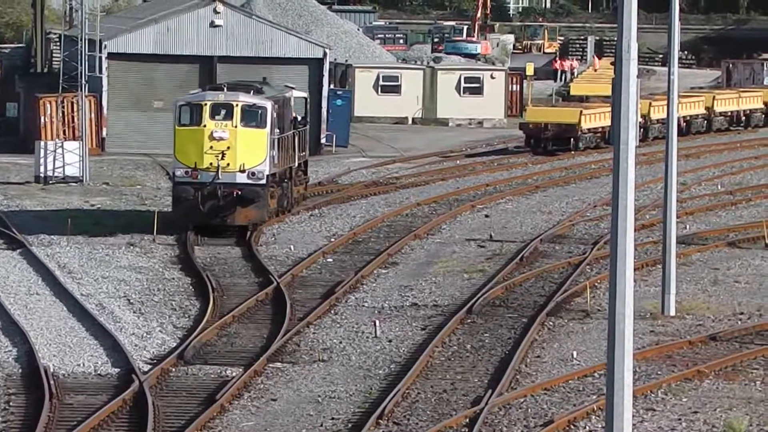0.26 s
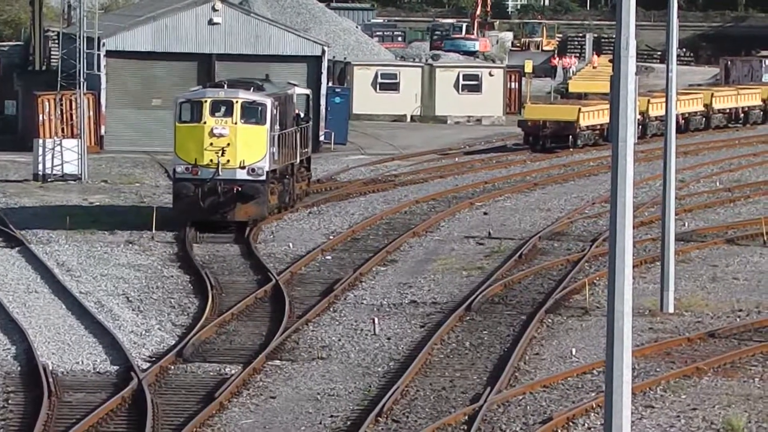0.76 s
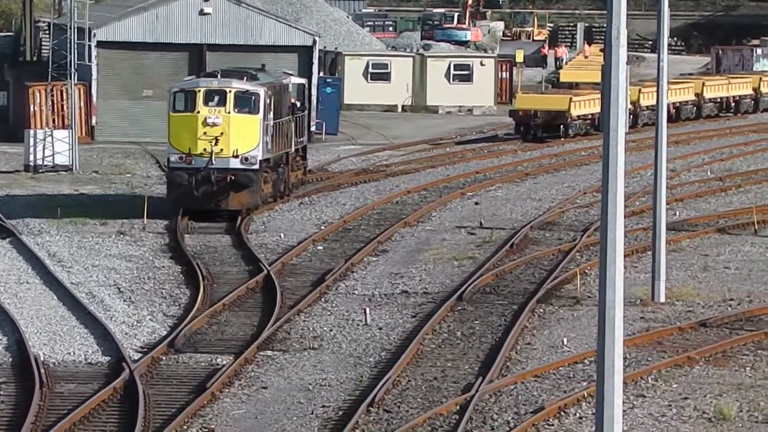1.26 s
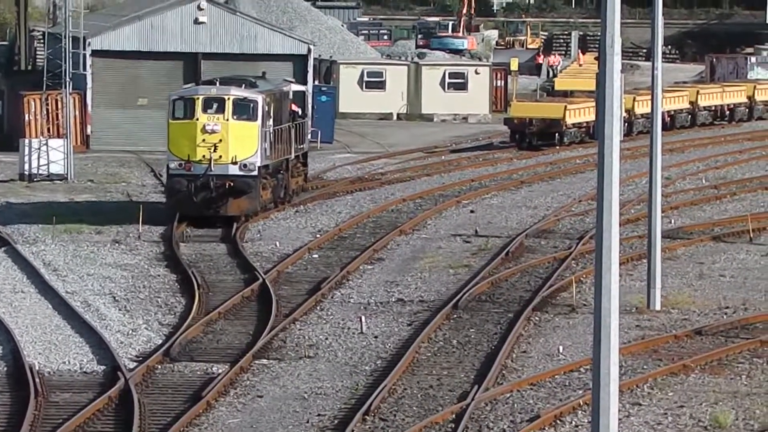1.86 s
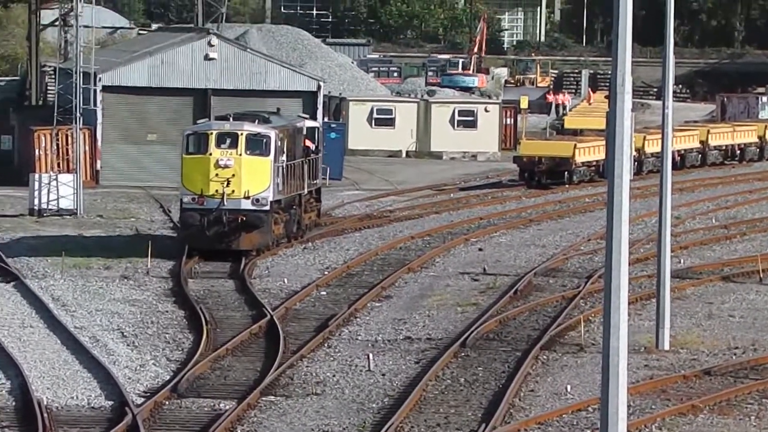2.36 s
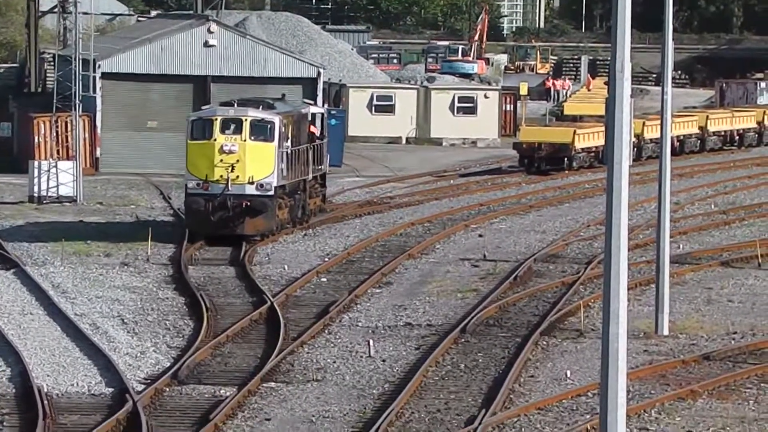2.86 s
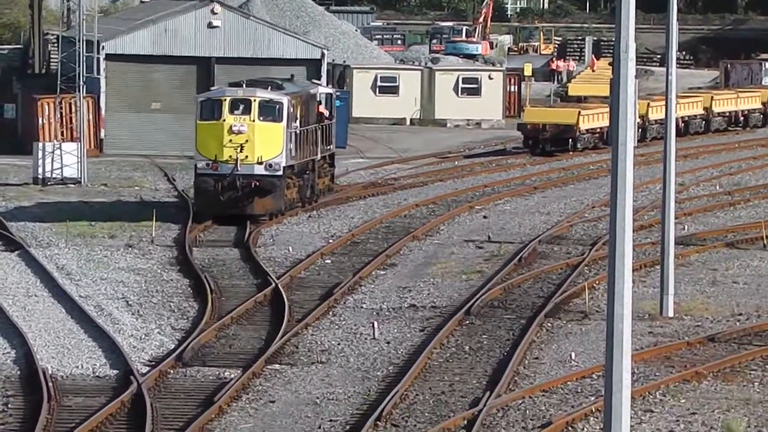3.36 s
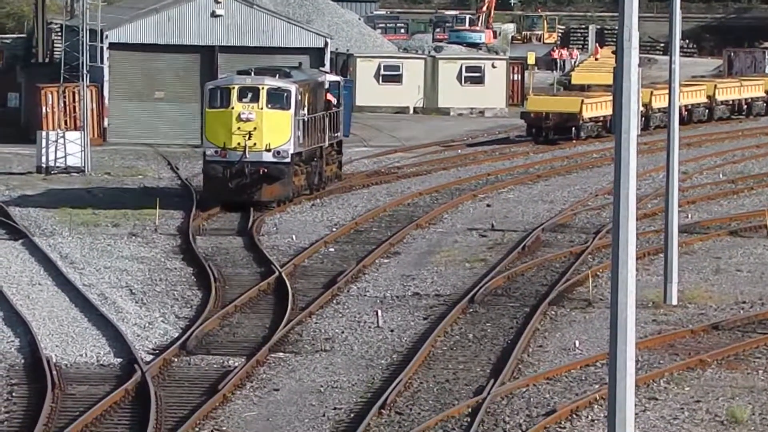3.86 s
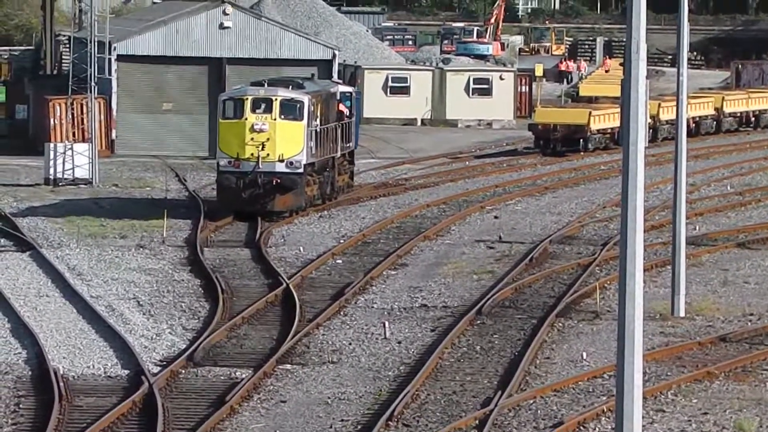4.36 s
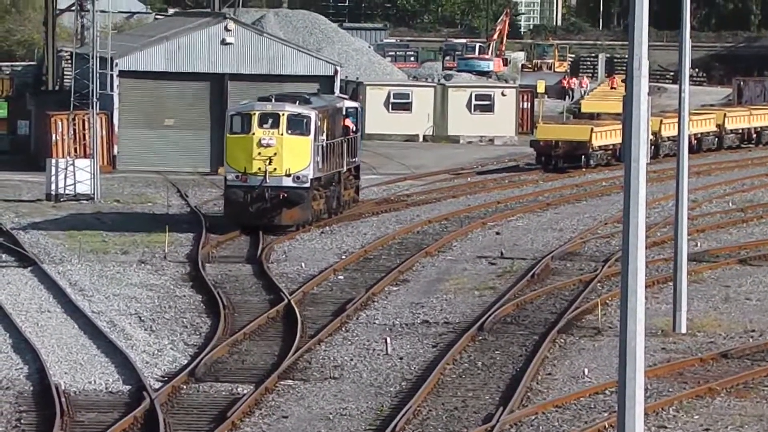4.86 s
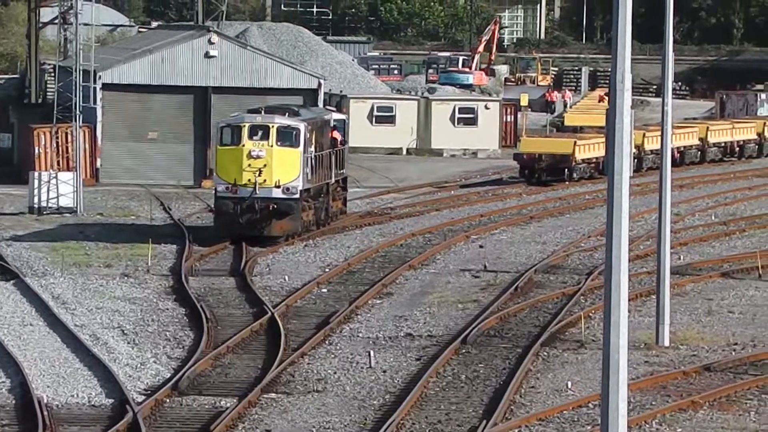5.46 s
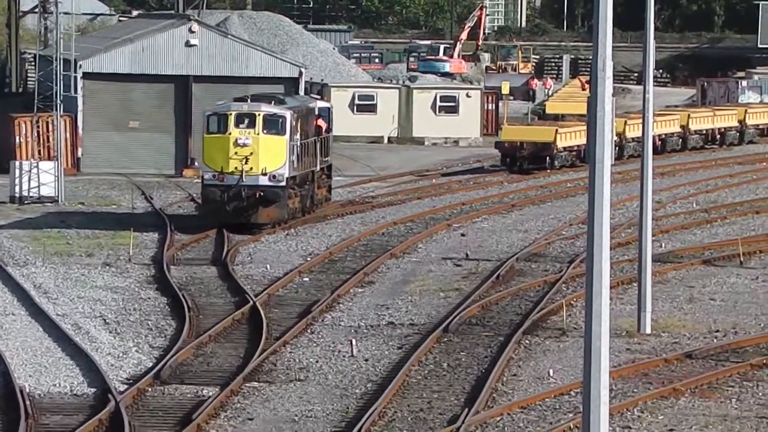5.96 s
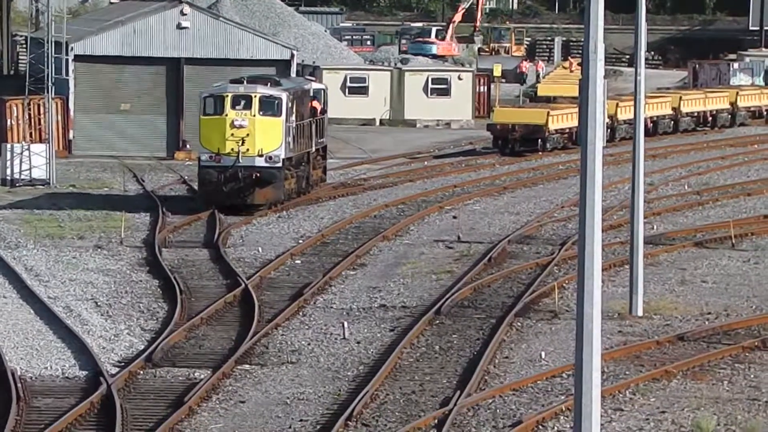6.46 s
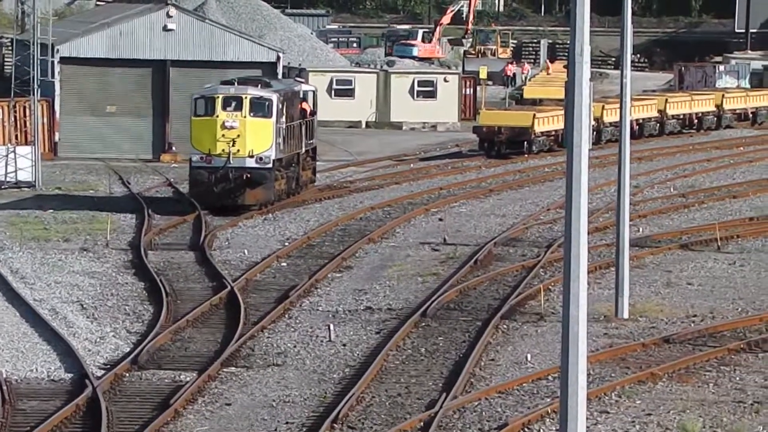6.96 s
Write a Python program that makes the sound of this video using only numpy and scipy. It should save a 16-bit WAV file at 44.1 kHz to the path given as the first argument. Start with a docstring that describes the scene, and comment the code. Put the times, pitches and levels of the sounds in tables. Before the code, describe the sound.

Outdoors in a rail yard, a diesel locomotive throbs and roars, its pitch sagging as it grows louder. A gear whine and tiny metallic squeak surface on the way. After the peak the firing quickens and the engine softens, with couplings knocking and a bird chirping faintly. Air hiss runs throughout. A stereo microphone some way off catches small close ticks; the low sound starts centred, then widens.

```python
"""A diesel locomotive in a rail yard: puffed noise and wavering firing tones bog down for about 3 s.
On the way a gear whine (gliding tones) and a squeak (jittered tones) enter, among ticks of shaped noise.
The roar peaks near 3.3 s; then the firing quickens and the engine eases, amid knocks and chirps of a bird.
Air hiss runs throughout. Treble noise is in opposite phase at the microphone pair; the low sound is
centred at first, and later spreads, mostly to the right, in wide spans."""
import sys
import numpy as np
from scipy import signal
from scipy.fft import rfft, irfft, next_fast_len
from scipy.io import wavfile
from scipy.ndimage import uniform_filter1d, map_coordinates

SR = 44100
rng = np.random.default_rng(int(sys.argv[2]) if len(sys.argv) > 2 else 0)


def transcribe(signal):
    """Save signal, clipped to [-1, 1], as a 16-bit WAV file at the path in sys.argv[1]."""
    frames = np.atleast_2d(signal).T
    limited = np.clip(frames, -1, 1)
    pcm = np.round(limited * 32767).astype(np.int16)
    wavfile.write(sys.argv[1], SR, pcm)


N = 318402

# Engine course: t/s, mean firing rate f/Hz, rumble level/dB, roar level/dB
ENGINE = [(0, 117.5, -27.5, -27.5), (.3, 116.4, -28, -24), (.7, 113.4, -26.5, -23.5),
          (1.1, 109.2, -25.5, -21), (1.45, 108.4, -28, -22.5), (1.75, 105.9, -24.5, -25),
          (2.05, 103.9, -30, -20), (2.2, 101.7, -20.5, -20), (2.55, 98.5, -27.5, -19.5),
          (2.85, 98.2, -34.5, -18.5), (3.1, 98.3, -24.5, -18), (3.3, 98.7, -20, -15),
          (3.55, 100.1, -19.5, -16.5), (3.85, 102.3, -19.5, -18), (4.2, 106.4, -22, -19),
          (4.55, 107.2, -26, -21.5), (5.25, 115.6, -27, -23), (5.8, 117.4, -27.5, -23),
          (6.2, 120.2, -34, -27), (6.6, 125.5, -34, -28), (7.22, 128.7, -34.5, -30.5)]
# Colour change as the engine moves along the curve: t/s, share of the later spectrum
TURN = [(0, 0.069), (1.8, 0.064), (2.1, 0.39), (2.6, 1), (7.22, 1)]

# Spectra: one, or an earlier and a later one; each f/Hz, relative level/dB
RUMBLE_SPECTRA = [
    [(13, -34), (22, -20), (54, -6.5), (108, -0.5), (203, -7), (260, -8.5), (340, -46), (570, -120)],
    [(13, -46), (22, -29), (48, -3.5), (124, 3), (162, -2.5), (199, -2.5), (260, -20), (340, -34),
     (570, -120)],
]
ROAR_SPECTRA = [
    [(140, -17), (230, -19), (285, -7), (353, 5), (461, -0.5), (580, -1), (639, -3.5), (1150, -7.5),
     (1350, -35), (1760, -60), (2970, -120)],
    [(140, -9.5), (230, -3), (285, -3), (343, 2), (410, 3), (461, 3), (516, 0.5), (714, -3.5), (1030, -2),
     (1350, -14), (1760, -24.5), (2970, -120)],
]
CLATTER_SPECTRA = [
    [(760, -30), (1300, 1), (1430, 0), (1730, 8), (2080, 2.5), (2650, 2), (2970, 1), (3100, -46),
     (4030, -37), (6820, -120)],
    [(760, -26), (1300, -1), (1770, 2.5), (2150, -2), (2400, -8), (2800, -13), (3100, -13.5), (4030, -45),
     (6820, -120)],
]
FAN_SPECTRA = [
    [(1850, -44), (3150, 0.5), (3750, 9), (4460, 1.5), (5160, 2), (6300, -14), (7000, -7), (7500, -20),
     (9750, -72), (16500, -120)],
    [(1820, 0), (3100, 3), (3700, 4), (4020, 1.5), (4690, 1), (5920, -5), (7500, -18), (9750, -85),
     (16500, -120)],
]
AIR_LOW_SPECTRA = [
    [(1850, -54), (3150, -5), (3930, -3), (5260, 3), (6490, -1), (7600, -19), (9880, -49), (16700, -120)],
    [(1820, -13), (3100, -3.5), (3800, -5.5), (4840, -9.5), (6110, -11), (6950, -21), (7600, -20),
     (9880, -50), (16700, -120)],
]
AIR_HIGH_SPECTRA = [
    [(4760, -34), (8100, -10), (8420, 1), (8930, 3), (10400, -8), (11300, 3), (11800, -1), (15100, -11),
     (15800, -8.5)],
    [(4760, -35), (8100, -7), (8520, -4), (9030, -3), (13400, -7), (15100, -13), (15800, -14)],
]
AIR_CENTRE_SPECTRA = [
    [(4880, -46), (8300, -10), (10700, -1), (12500, 1), (13900, 4), (15000, 6.5), (15800, -11)],
    [(4880, -44), (8300, -3.5), (10000, -0.5), (14900, -1), (15800, -4)],
]
BASS_APART_SPECTRA = [
    [(15, -48), (25, -11), (118, -1), (261, -12), (331, -13), (500, -13), (650, -33), (1100, -120)],
]
MID_APART_SPECTRA = [
    [(300, -30), (700, -10), (1500, -7), (2500, 5), (3100, -10), (3600, -44)],
    [(300, -30), (600, 1), (1200, 6), (2000, 3), (3100, -10), (3600, -20)],
]
# Spectrum of the deep heaves: f/Hz, relative level/dB
HEAVE_SPECTRUM = [(13, -24), (30, -10), (48, -5), (80, -6), (150, -5), (260, -33), (570, -120)]
# Deep heaves under the rumble: t/s, relative level/dB, half width/s
HEAVES = [(.74, -27.5, 0.045), (.785, -28, 0.013), (2.17, -33, .06), (2.37, -33, 0.027), (2.53, -30, 0.035),
          (2.81, -31, .02), (3.3, -39, 0.076), (3.52, -33, 0.029), (5.03, -31, 0.039), (5.2, -37, .04),
          (5.71, -40, 0.031), (6.501, -40, 0.036), (6.95, -40, 0.098)]

# One firing order stands out for a while: from t/s, to t/s, order (multiple of firing rate), level/dB
SWELLS = [(1.75, 2.354, 2, -33), (3.302, 4.293, 2, -35), (0.06, 0.49, 3, -32), (1.185, 1.55, 3, -25.5),
          (1.718, 1.886, 3, -28), (4.25, 4.45, 4, -29.5), (5.4, 5.597, 4, -38), (2.102, 2.395, 3, -28),
          (3.245, 3.686, 3, -29), (4.49, 4.655, 3, -28), (4.715, 4.86, 3, -30.5), (4.949, 5.257, 3, -27.5),
          (5.315, 5.555, 3, -29), (5.699, 6.104, 3, -35.5), (6.852, 7.147, 3, -39), (1.542, 2.01, 4, -29.5),
          (2.05, 2.39, 4, -24.5), (2.55, 2.78, 4, -26), (2.91, 3.206, 4, -22), (3.36, 3.54, 4, -23.5),
          (3.6, 3.7, 4, -28), (3.78, 4.05, 4, -33), (4.65, 5.352, 4, -35), (.05, 0.465, 5, -39),
          (1.453, 2.054, 5, -32), (1.9, 2.38, 5.1, -28), (1.7, 2, 3.3, -31), (4.47, 4.6, 4.9, -30),
          (3.1, 3.25, 5, -30), (3.25, 3.5, 5.1, -28), (4.399, 4.7, 5, -40), (1.6, 2.1, 6, -32.5),
          (3.237, 3.596, 6, -33.5)]
# Moving dip, later a narrow peak, in the upper mids: t/s, centre f/Hz, half width f/Hz, gain level/dB
HOLLOW = [(1.5, 3210, 200, 3), (1.62, 3200, 200, -1), (1.84, 3250, 250, 1), (1.87, 2730, 500, -12),
          (1.93, 2770, 400, -6), (2, 2780, 300, -9), (2.08, 2990, 248.4, -8), (2.2, 3070, 250, -5),
          (2.45, 2960, 200, -1), (2.55, 2967, 197.8, -9), (2.65, 3000, 200, -1), (3.1, 2970, 200, -2.5),
          (4.3, 2800, 150, 1.5), (4.7, 2760, 130, 3), (5, 2780, 130.3, 8), (5.4, 2780, 130, 6),
          (5.9, 2800, 150, 2.5), (7.22, 2802, 150, 3)]
# Two bands that swell on their own: t/s, upper band level/dB, lower band level/dB
THROAT = [(0, 4.5, -4.5), (.6, 1, 1.5), (1.1, -1.5, 1.5), (1.7, 7.5, -3), (2.05, 6, -1), (2.5, 4.5, 1),
          (2.9, -1, 8), (3.3, -2, -0.5), (3.9, -1, 1), (4.4, 3, 0.5), (5, 3.5, 1), (5.5, -1.5, 1.5),
          (6.2, -1, -2), (7.22, 2, -1.5)]
# Stretches of gear whine, each: t/s, f/Hz, level/dB
WHINE = [
    [(1.49, 1716, -42), (1.525, 1716, -32), (1.57, 1715, -42), (1.61, 1716, -34), (1.66, 1715, -46),
     (1.76, 1715, -36), (1.86, 1714, -32), (1.9, 1714, -37), (1.955, 1715, -26), (2.01, 1714, -31),
     (2.08, 1713, -33), (2.15, 1714, -30), (2.21, 1715, -26), (2.25, 1714, -32), (2.29, 1713, -38),
     (2.34, 1714, -29), (2.42, 1714, -27), (2.5, 1713, -31), (2.6, 1712, -33), (2.65, 1712, -40),
     (2.7, 1712, -33), (2.78, 1710, -33), (2.87, 1706, -39), (2.93, 1700, -46)],
    [(2.96, 1556, -38), (3, 1552, -30), (3.04, 1552, -36), (3.09, 1553, -32), (3.13, 1555, -38)],
    [(3.75, 1712, -44), (4, 1712, -42), (4.62, 1716, -43)],
]
# Faint high tone as the engine eases: t/s, f/Hz, level/dB
FAINT = [(6.28, 4620, -68), (6.74, 4590, -70), (6.95, 4560, -73)]
# Wheels and couplings: t/s, peak level/dB, centre f/Hz
KNOCKS = [(5.083, -13, 850), (5.211, -13, 950), (5.225, -16, 850), (5.236, -13, 950), (5.269, -14, 950),
          (5.546, -16, 1000), (5.56, -28, 2400), (5.575, -18, 950), (5.629, -14, 900), (5.715, -17, 950),
          (5.91, -30, 2300), (6.02, -24, 1400), (6.08, -18, 1400), (6.865, -20, 350)]

# Treble course: t/s, upper-mid level/dB, top level/dB
TREBLE = [(0, -43, -46.5), (.35, -41, -41.5), (.7, -41, -41), (1.1, -38.5, -40.5), (1.6, -36, -37.5),
          (2, -31, -36.5), (2.25, -32.5, -39), (2.6, -34, -43), (2.9, -43, -47), (3.1, -36, -44.5),
          (3.3, -36.5, -46.5), (3.7, -40.5, -47), (4.2, -41.5, -48.5), (4.7, -43, -54), (5.3, -45, -57.5),
          (5.65, -47, -54), (5.9, -48.5, -63), (6.5, -57, -61.5), (7.22, -56, -64)]
# Brief dips in level: t/s, length/s, treble level/dB, middle level/dB, bass level/dB
DIPS = [(0.741, 0.26, -5.5, -6, -1), (0.797, 0.067, -1.5, -0.5, -5), (1.862, 0.06, -0.5, -2.5, -1),
        (2.715, 0.073, -5.5, -3.5, -1), (3.113, 0.05, -3.5, -6, -2.5)]
# Low sound that differs between the ears: t/s, bass level/dB, upper-mid level/dB
SPREAD = [(1.85, -38, -28.5), (2.2, -37, -25.5), (2.4, -24, -27.5), (2.55, -26, -31), (2.74, -32, -42),
          (2.95, -31, -43), (3.1, -35, -42), (3.3, -37, -32), (3.6, -48, -36.5), (4.4, -42, -36.5),
          (5.2, -37, -41), (5.6, -38, -47), (6, -31, -46), (6.2, -35, -54), (6.6, -37, -58)]
# Spans in which the low sound spreads out: from t/s, to t/s
WIDE = [(1.84, 2.75), (2.95, 6.45), (6.55, 6.65)]
# Balance of the engine: t/s, left minus right level/dB
LEAN = [(1.52, 2), (2.21, -4), (2.89, 0), (3.41, -4), (5.94, -4.5), (6.7, -.5)]

# Ticks near the microphone: t/s, relative peak level/dB, centre f/Hz, relative width, spread/ms
TICKS = [(.523, -27.5, 5350, 0.51, 1.2), (.546, -37, 5100, 0.26, 2), (.739, -30, 9900, 2, 0.95),
         (2.974, -38, 9000, 2, 0.82), (3.03, -35, 9500, 1.19, 1.35), (3.159, -33, 5500, 0.73, 1.2),
         (3.676, -23, 9496, 3.6, 0.74), (4.975, -36, 5937, 1.04, 1.54), (5.516, -39, 12120, 1.11, 1.17),
         (5.563, -45, 10490, .8, 3.98), (5.614, -38, 12020, 1.9, 2.5), (5.64, -42, 11500, 1.27, 4.5),
         (5.667, -41, 11500, 1.22, 1), (5.733, -40, 10500, 0.98, 0.97)]
# Metal rubbing: t/s, f/Hz, length/s, relative level/dB
SQUEAK = [(2.585, 11600, 0.023, -37), (2.587, 12550, .055, -37)]
# Chirps, each: t/s, f/Hz, relative level/dB
BIRD = [
    [(4.285, 3600, -51), (4.31, 3800, -48), (4.335, 3780, -50)],
    [(5.893, 3650, -55), (5.908, 3250, -49), (5.92, 3400, -48), (5.932, 3650, -53)],
    [(5.965, 3500, -56), (5.98, 3800, -52), (6.003, 3850, -49), (6.018, 3450, -50), (6.03, 3250, -48),
     (6.045, 3300, -47), (6.052, 3400, -56), (6.064, 3400, -50), (6.07, 3350, -56)],
    [(6.118, 3400, -56), (6.132, 4700, -56), (6.138, 5700, -54), (6.143, 5300, -55), (6.148, 4400, -55),
     (6.165, 4600, -57), (6.176, 4300, -58), (6.184, 3500, -51), (6.192, 3450, -55)],
    [(6.15, 3700, -58), (6.165, 4050, -57), (6.175, 4150, -58)],
    [(6.186, 4050, -53), (6.198, 4150, -50), (6.208, 3650, -51), (6.226, 3600, -49), (6.242, 3150, -54)],
    [(6.945, 5200, -68), (6.96, 5200, -63), (6.975, 5250, -68)],
    [(6.96, 3750, -63), (6.985, 3750, -62)],
    [(7.035, 4550, -66), (7.05, 4540, -62), (7.065, 4520, -67)],
]
# Echoes from the sheds: delay t/s, level/dB
BIRD_ECHOES = [(.007, -7), (.019, -10)]


def engine(noise):
    """Periodic combustion: one phase both puffs the exhaust noise and carries the firing orders."""
    firing_hz, rumble_db, roar_db = curves(ENGINE)
    _, middle_dip_db, bass_dip_db = dips()
    firings = np.cumsum(firing_hz + .7 * wobble(8)) / SR
    puffed = noise * (1 + .12 * np.cos(2 * np.pi * firings))
    body = rumble(noise, rumble_db + bass_dip_db)
    body += roar(puffed, roar_db + bass_dip_db)
    body += clatter_and_fan(puffed, noise, roar_db, middle_dip_db)
    return hollowed(body) + firing_tones(firings, roar_db + bass_dip_db) + whine()


def rumble(noise, level_db):
    """Low-frequency radiation: coloured noise, with short Gaussian heaves beneath it."""
    steady = amp(level_db + .6 * wobble(20)) * rush(RUMBLE_SPECTRA, noise)
    heave_gain = sum(amp(db) * bump(s, half_s) for s, db, half_s in HEAVES)
    return steady + heave_gain * rush([HEAVE_SPECTRUM], noise)


def roar(puffed, level_db):
    """Amplitude modulation: the noisy part of the exhaust pulses at the firing rate."""
    return amp(level_db - 2 + 0.66 * wobble(30)) * rush(ROAR_SPECTRA, puffed)


def clatter_and_fan(puffed, noise, roar_db, middle_dip_db):
    """Filtered noise: clatter follows a blend of roar and upper mids, the fan the upper mids alone."""
    fan_db, flicker_db = curves(TREBLE)[0], 0.3 * wobble(9)
    blend_db = roar_db + 0.48 * (fan_db - roar_db)
    clatter_db = blend_db - 2.5 + middle_dip_db + flicker_db
    clatter = amp(clatter_db) * rush(CLATTER_SPECTRA, puffed)
    return clatter + amp(fan_db + dips()[0] + flicker_db) * rush(FAN_SPECTRA, noise)


def firing_tones(firings, roar_db):
    """Harmonic series: multiples of the firing rate, with faint partials from unequal cylinders."""
    base_db, fade_s = -27.5, .12  # level between swells, relative to the roar
    flutter_db, drift_rad = 3, .13  # drift is per order
    tones = 0
    # air turbulence on the way makes every order swell and drift on its own
    for order in sorted({*range(2, 7), *(round(k, 1) for a, b, k, db in SWELLS)}):
        swells = [(a, b, db) for a, b, k, db in SWELLS if round(k, 1) == order]
        level = amp(roar_db + base_db) + sum(amp(db) * span(a, b, fade_s) for a, b, db in swells)
        phase = 2 * np.pi * order * firings + order * drift_rad * wobble(32)
        tones = tones + level * amp(flutter_db * wobble(36)) * np.sin(phase)
    # unequal cylinders: partials at thirds of an order, slowly swaying
    for third in range(8, 21):
        level = amp(roar_db - 22 + 3.5 * wobble(6))
        tones = tones + level * np.sin(2 * np.pi * third / 3 * firings + wobble(15))
    return np.sqrt(2) * tones


def whine():
    """Frequency modulation: gear tones, and a later faint tone, glide with unsteady pitch and level."""
    gears = sum(glide(part, waver_hz=3, flutter_db=1, rate=35) for part in WHINE)
    return gears + glide(FAINT, waver_hz=18, flutter_db=1.5, rate=40)


def hollowed(x):
    """Time-varying filtering: a moving dip or peak and two swelling bands shape the spectrum of x."""
    hz, t, z = signal.stft(x, SR, nperseg=512)

    def read(rows):
        s, *cols = np.transpose(rows)
        return [np.interp(t, s, c) for c in cols]

    def band(centre_hz, half_width_hz, db):
        return db * np.exp(-((hz[:, None] - centre_hz) / half_width_hz) ** 2)

    upper_db, lower_db = read(THROAT)
    gain_db = band(*read(HOLLOW)) + band(1020, 495, upper_db) + band(200, 70, lower_db)
    return signal.istft(z * amp(gain_db), nperseg=512)[1][:N]


def knocks():
    """Impact excitation: wheels and couplings knock, with 48 softer jolts scattered among them."""
    when, size, pitch = rng.random((48, 3)).T
    jolt_s = np.interp(when, [0, 1], (4.9, 6.15))
    jolts = zip(jolt_s, -20 - 6 * size, 950 * (.8 + .7 * pitch ** 2))
    return clicks([(s, db, hz, .55, 1.7) for s, db, hz in [*KNOCKS, *jolts]])


def spread(centre, noise):
    """Interaural difference: a level balance, plus low sound unlike at the two ears."""
    half_db = curves(LEAN)[0] / 2
    left, right = amp(half_db), amp(-half_db)
    lean = (left - right) / (left + right)
    bass_db, upper_db = curves(SPREAD)
    bass = amp(bass_db + 1.87 * wobble(14)) * rush(BASS_APART_SPECTRA, patchy(patchy_db=4))
    upper = amp(upper_db) * rush(MID_APART_SPECTRA, noise, shift=np.pi / 2)
    return lean * centre + bass + upper


def squeak():
    """Stick-slip friction: high tones with jittered phase and level, quick to rise and slower to fade."""
    t, out = np.arange(N) / SR, 0
    for s, hz, length, db in SQUEAK:
        u = np.clip((t - s) / length, 0, 1)
        rub = np.sin(2 * np.pi * hz * t + 1.8 * wobble(500))
        out = out + amp(db + 5.5 * wobble(300)) * np.sqrt(u) * (1 - u) * rub
    return out


def bird():
    """Discrete reflection: gliding chirps some way off, blurred by two echoes from the sheds."""
    song = amp(-1.5) * sum(glide(chirp, waver_hz=85, flutter_db=3.5, rate=250) for chirp in BIRD)
    return song + sum(amp(db) * np.roll(song, round(s * SR)) for s, db in BIRD_ECHOES)


def air_apart(oblique, mids_db, high_db):
    """Phase quadrature: treble noise a quarter cycle on forms the opposite-phase air."""
    rattle_db = 1.4 * wobble(28) * curves(TURN)[0]  # loose parts make the upper mids flicker
    low = amp(mids_db + 3 + rattle_db) * rush(AIR_LOW_SPECTRA, oblique, shift=np.pi / 2)
    return low + amp(high_db) * rush(AIR_HIGH_SPECTRA, oblique, shift=np.pi / 2)


def air_centre(noise, high_db):
    """Power addition: the centred top follows the treble, over a steady quiet hiss."""
    return np.hypot(amp(high_db - 6.5), amp(-67.5)) * rush(AIR_CENTRE_SPECTRA, noise)


def amp(db):
    """Logarithmic level: decibels to amplitude gain."""
    return np.exp(np.asarray(db) * np.log(10) / 20)


def unit(x):
    """Mean-square normalisation: x scaled to rms 1."""
    return x / np.sqrt(np.mean(x ** 2) + 1e-20)


def curves(rows):
    """Linear interpolation: one value per sample for each column after the time."""
    s, *cols = np.transpose(rows)
    return [np.interp(np.arange(N) / SR, s, c) for c in cols]


def wobble(rate):
    """Band-limited fluctuation: a smooth random curve with rate knots a second."""
    coarse = np.arange(0, N + 16, 16)
    knots = rng.standard_normal(int(N * rate / SR) + 4)
    return np.interp(np.arange(N), coarse, map_coordinates(knots, [coarse * rate / SR]))


def filtered(x, response):
    """Linear filtering: the spectrum of x times a response of frequency."""
    m = next_fast_len(N + 8192)
    return irfft(rfft(x, m) * response(np.fft.rfftfreq(m, 1 / SR)), m)[..., :N]


def rush(spectra, noise, shift=0):
    """Spectral shaping: rms-1 coloured noise crossfades first to last spectrum; shift in radians."""
    def colour(hz):
        gains = []
        for f, db in map(np.transpose, spectra):
            gain_db = np.interp(np.log(hz + 1), np.log(f), db, -120, -120)
            gains.append(np.exp(1j * shift) * amp(gain_db))
        return gains

    shades = filtered(noise, colour)
    later = np.clip(curves(TURN)[0], 0, 1)
    return (1 - later) * unit(shades[0]) + later * unit(shades[-1])


def glide(rows, waver_hz, flutter_db, rate):
    """Phase integration: a tone along t/s, f/Hz, level/dB rows, silent outside them."""
    hz, db = curves(rows)
    t = np.arange(N) / SR
    fade = np.clip(np.minimum(t - rows[0][0], rows[-1][0] - t) / 0.0027, 0, 1)
    unsteady = wobble(rate)
    phase = 2 * np.pi * np.cumsum(hz + waver_hz * unsteady[::-1]) / SR
    return np.sqrt(2) * fade * amp(db + flutter_db * unsteady) * np.sin(phase)


def patchy(patchy_db):
    """Non-stationary noise: white noise with random gain in patches of time and frequency."""
    z = signal.stft(rng.standard_normal(N), nperseg=512)[2]
    field = uniform_filter1d(uniform_filter1d(rng.standard_normal(z.shape), 6, 0), 10, 1)
    return signal.istft(z * amp(patchy_db * unit(field)), nperseg=512)[1][:N]


def clicks(rows):
    """Transient excitation: Gaussian noise bursts, each with its own colour and length."""
    out, ms = np.zeros(N + SR), np.arange(1024) / SR * 1000
    hz = np.fft.rfftfreq(len(ms), 1 / SR) + 1
    grits = rng.standard_normal((len(rows), len(ms)))
    for (s, db, centre_hz, width, spread_ms), grit in zip(rows, grits):
        burst = grit * np.exp(-.5 * ((ms - 11) / spread_ms) ** 2)
        octaves_off = np.log2(hz / centre_hz)
        click = irfft(rfft(burst) * np.exp(-2 * (octaves_off / (0.79 * width)) ** 2))
        start = round((s - .01) * SR)  # early, as the burst peaks inside its window
        out[start:][:len(ms)] += amp(db) * click / np.abs(click).max()
    return out[:N]


def bump(s, half_s):
    """Gaussian envelope: a smooth rise and fall around s."""
    return np.exp(-((np.arange(N) / SR - s) / half_s) ** 2)


def dips():
    """Level envelope: treble, middle and bass dB fall quickly, hold, then return more slowly."""
    fall_s, out = 0.0051, 0
    for s, length, *depth_db in DIPS:
        t = np.arange(N) / SR - s
        shape = np.clip(np.minimum(t / fall_s, 2 - 2 * t / length), 0, 1)
        out = out + np.outer(depth_db, shape)
    return out


def span(a, b, fade_s):
    """Trapezoidal gate: opens from a to b, with ends sloped over fade_s."""
    t = np.arange(N) / SR
    return np.clip(np.minimum(t - a, b - t) / fade_s + .5, 0, 1)


def scene():
    """Sum and difference: centre and side signals make left and right."""
    t = np.arange(N) / SR
    mids_db, high_db = curves(TREBLE) + dips()[0]
    direct, scattered = patchy(patchy_db=1.14), patchy(patchy_db=-2.0)
    # a wave from one side reaches the ports apart in time:
    # its difference is the same noise a quarter cycle on
    bearing = np.interp(t, [3.1, 3.8], [.66, -.66])  # the leading port changes sides
    oblique = bearing * direct + np.sqrt(1 - bearing ** 2) * scattered
    motor = engine(direct) + knocks()
    near, singer = clicks(TICKS) + squeak(), bird()
    centre = motor + air_centre(direct, high_db) + amp(3.5) * near + singer
    side = air_apart(oblique, mids_db, high_db) + spread(motor, oblique)
    side += amp(1.5) * np.roll(near, 3) - np.roll(singer, 1)  # shifts in samples
    # below the split the ears differ only in the wide spans
    split_hz = 3120
    wide = sum(span(a, b, fade_s=0.031) for a, b in WIDE)
    side -= (1 - wide) * filtered(side, lambda hz: hz < split_hz)
    return np.array([centre + side, centre - side])


def record(dry):
    """Saturation and resonance: peaks round off, the housing cuts a notch, a limit ends the band."""
    top_hz = 15780
    rounded = dry / (1 + np.abs(dry / .95) ** 5) ** (1 / 5)

    def response(hz):
        notch = 1 - .85 / (1 + ((hz - 7850) / 130) ** 2)
        return notch * (hz < top_hz)

    return filtered(rounded, response)


dry = scene()
out = record(dry)
transcribe(out)
```